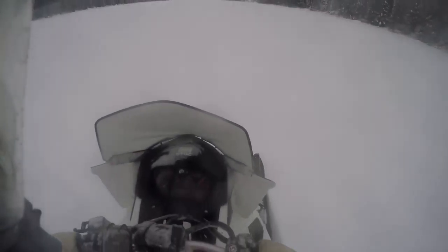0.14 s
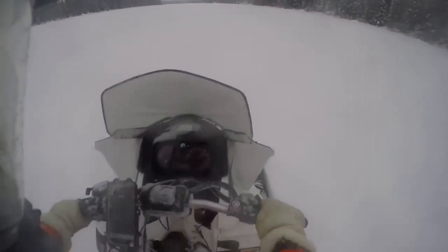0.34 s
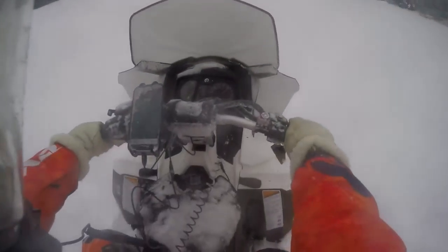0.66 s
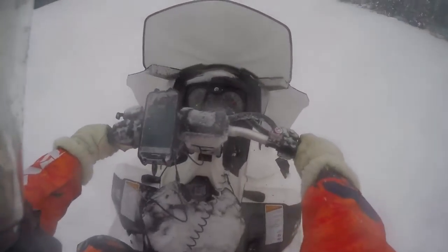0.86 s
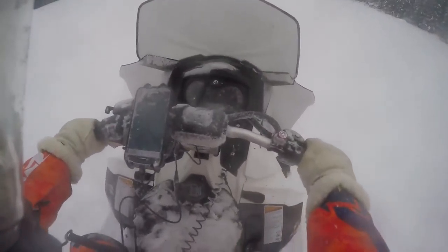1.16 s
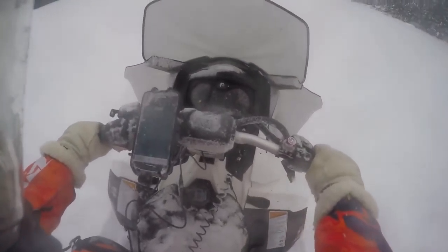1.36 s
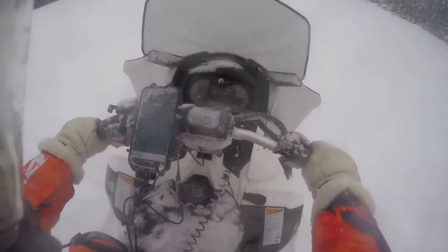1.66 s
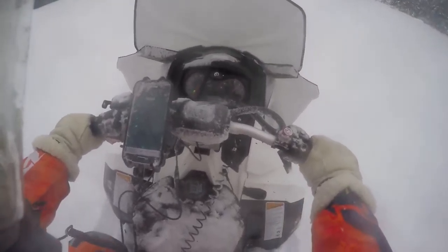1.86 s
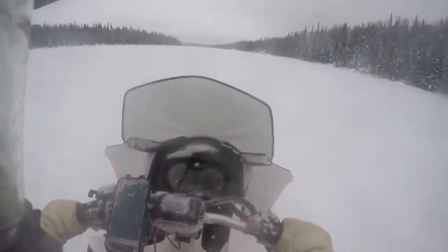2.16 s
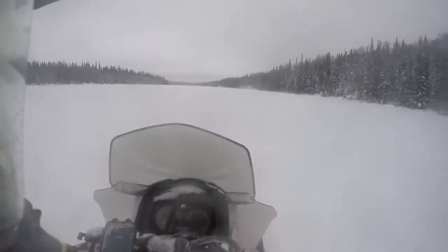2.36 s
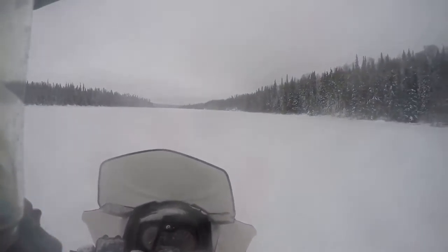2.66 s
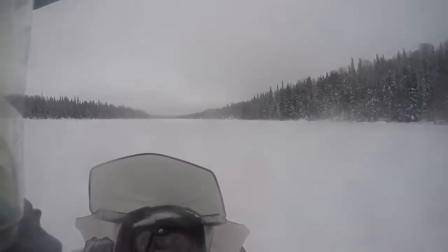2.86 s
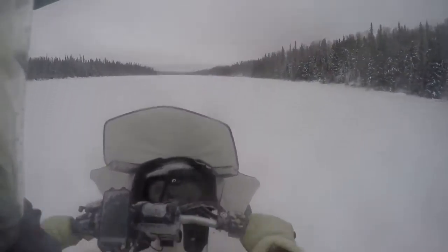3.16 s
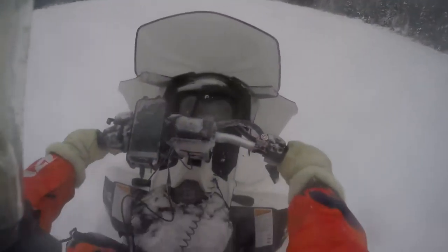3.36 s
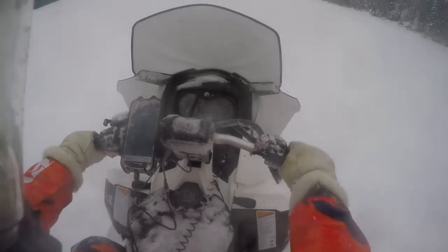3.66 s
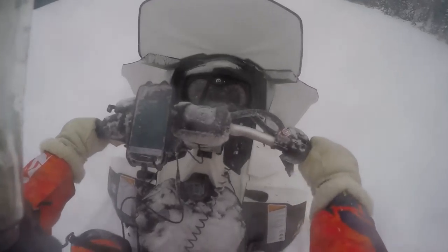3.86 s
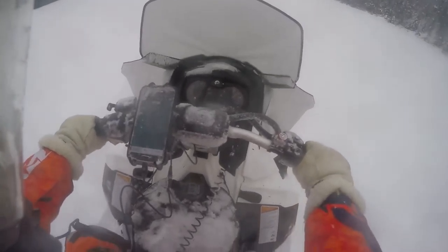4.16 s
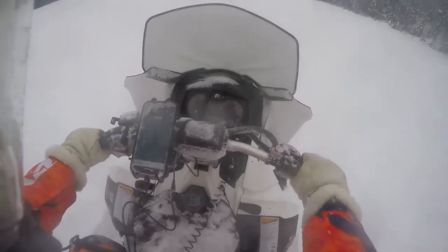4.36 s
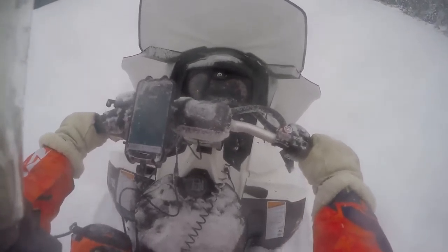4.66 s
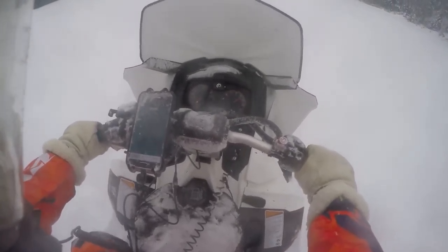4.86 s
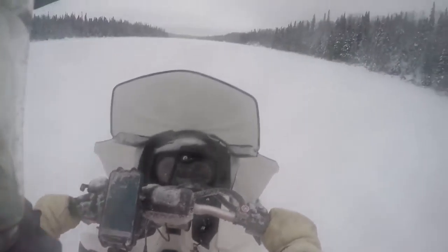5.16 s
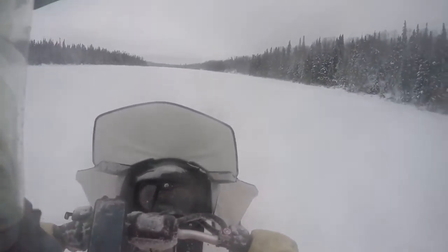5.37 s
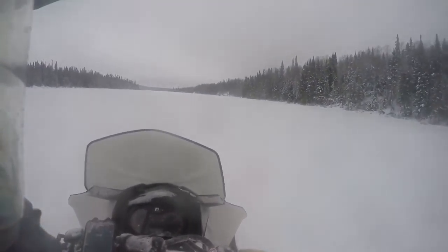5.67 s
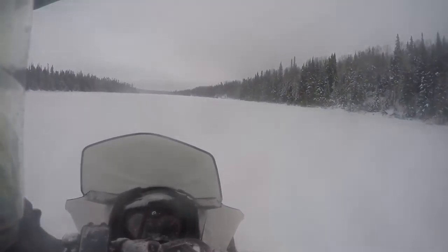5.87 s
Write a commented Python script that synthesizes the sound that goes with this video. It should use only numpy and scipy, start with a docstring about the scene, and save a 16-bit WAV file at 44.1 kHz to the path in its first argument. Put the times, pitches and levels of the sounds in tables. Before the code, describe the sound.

A snowmobile is already cruising at 0 s and never stops, heard from a cased camera on the rider's helmet over an open frozen lake. A steady engine drone and low roar blend with a humming track, rapid mechanical clatter and a narrow, boxy hiss of snow and air. A small sharp knock with an ice tick lands at 0.2 s. Wind is light at first, then deep, fluttering booms come irregularly, with strong thumps near 2.1, 2.7, 3.6 and 4.5 s. Slight rustles occur around 2.1 and 2.5 s. From about 2.4 s the revs climb a little, pulling hardest around 3.4 to 4 s. Ice ticks gather near 3.2 s, and one very loud, brief click snaps at 3.28 s. The revs sink until 4.8 s, then recover slightly. Faint ticks and wind buffets continue over the unbroken drone until 6 s.

```python
"""A three-cylinder four-stroke snowmobile engine drones, roars and clatters on a frozen lake.
The one microphone rides in a cased camera on the rider's helmet: drone and lug hum are tones locked to
the engine cycle and the track; clatter is a slowly changing noise pattern; snow and air hiss is noise
shaped by the case. Wind booms in buffets at the helmet, ice grains tick on the case, and short
noise bursts knock and rustle at the camera."""
import sys
import numpy as np
from scipy import signal
from scipy.fft import rfft, irfft
from scipy.io import wavfile
from scipy.ndimage import uniform_filter1d, map_coordinates

SR = 44100
rng = np.random.default_rng(int(sys.argv[2]) if len(sys.argv) > 2 else 0)


def bounce(signal):
    """Save signal as a 16-bit WAV file at the path given by the first command-line argument."""
    frames = np.transpose(np.atleast_2d(signal))
    limited = np.clip(frames, -1, 1)
    pcm = np.round(limited * 32767).astype(np.int16)
    wavfile.write(sys.argv[1], SR, pcm)


N = 265482
TIME = np.arange(N) / SR  # s
BIN_HZ = np.arange(N // 2 + 1) * SR / N  # frequencies of the spectrum


def undb(db):
    """Gain of a level in dB."""
    return 10 ** (np.asarray(db) / 20)


def unit(x):
    """Scaled to rms 1."""
    return x / np.sqrt(np.mean(x ** 2))


def curves(table):
    """The columns after start_s, interpolated at every sample."""
    start_s, *columns = np.transpose(table)
    return [np.interp(TIME, start_s, column) for column in columns]


def walk(rate_hz):
    """Random levels held for 1 / rate_hz seconds, smoothed twice and scaled to rms 1."""
    hold = int(SR / rate_hz)
    steps = np.repeat(rng.standard_normal(N // hold + 1), hold)
    smooth = uniform_filter1d(uniform_filter1d(steps, hold), hold)
    return unit(smooth[:N])


def colour(x, points, rings=()):
    """Shapes the spectrum along (Hz, dB) points, plus narrow peaks and notches."""
    hz = BIN_HZ + 1e-3  # keeps the logarithm finite
    point_hz, point_db = np.array(points).T
    db = np.interp(np.log(hz), np.log(point_hz), point_db)
    for centre_hz, width_hz, ring_db in rings:
        db = db + ring_db / (1 + (2 * (hz - centre_hz) / width_hz) ** 2)
    return irfft(rfft(x) * undb(db), N)


def band(x, lo_hz, hi_hz, order=2):
    """Band-pass."""
    edges = [lo_hz, min(hi_hz, .45 * SR)]
    return signal.sosfilt(signal.butter(order, edges, "band", fs=SR, output="sos"), x)


def hum(turns, db, waver_db, wander):
    """A tone locked to a phase in turns; its level wavers and its phase wanders (turns rms)."""
    level = np.sqrt(2) * undb(db + waver_db * walk(9))
    phase = turns + rng.random() + wander * walk(6)
    return level * np.sin(2 * np.pi * phase)


# broad wind rumble, relative spectrum: pitch_hz [Hz], level_db [dB]
RUMBLE_SHAPE = [(12, -20), (22, 19), (35, 10.5), (60, 14), (90, -4.5), (130, -2), (200, -16.5), (400, -49)]
# level of the rumble between about 70 and 131 Hz: start_s [s], level_db [dB]
RUMBLE_LEVEL = [(0, -50), (.4, -50.5), (1.0, -43.5), (1.8, -47), (2.2, -43.5), (2.7, -39), (3.4, -38),
                (4.0, -42), (4.6, -44.5), (5.0, -45.5), (6.02, -40)]


def wind_rumble():
    """Turbulent air at the helmet: low noise with a slowly changing level."""
    rumble = colour(rng.standard_normal(N), RUMBLE_SHAPE)
    rumble = rumble / np.std(band(rumble, 70.3, 131.0, order=4))
    return undb(curves(RUMBLE_LEVEL)[0] + 1.74 * walk(8)) * rumble


# buffets of wind at the helmet: crest_s [s], level_db [dB at the crest], length_s [s between 1/e points]
BUFFETS = [(0.166, -35, .07), (0.452, -33.5, 0.058), (0.577, -26, 0.036), (0.724, -23, 0.096),
           (0.838, -21, 0.078), (0.99, -20, 0.18), (1.138, -26, 0.043), (1.331, -19.5, 0.21),
           (1.522, -23.5, .08), (1.696, -28.5, 0.1), (1.848, -23.5, .08), (1.918, -21.5, .08),
           (2.088, -13.5, 0.1), (2.21, -19, 0.091), (2.298, -17, 0.075), (2.4, -22, 0.09),
           (2.521, -22.5, 0.13), (2.722, -15.5, 0.072), (2.813, -19, .08), (2.976, -21.5, 0.075),
           (3.05, -20.5, 0.065), (3.171, -22.5, 0.052), (3.262, -19.5, 0.059), (3.365, -16.5, 0.097),
           (3.48, -25, 0.13), (3.602, -14, 0.043), (3.674, -20, 0.035), (3.722, -16, 0.04),
           (3.843, -18, .12), (4.061, -20, 0.074), (4.258, -25.5, 0.19), (4.435, -16.5, 0.15),
           (4.615, -14.5, 0.11), (4.789, -19.5, 0.17), (4.974, -33, 0.17), (5.104, -22, 0.15),
           (5.221, -26, 0.11), (5.359, -20, 0.13), (5.46, -20, 0.053), (5.548, -19.5, 0.076),
           (5.781, -24, 0.17), (5.912, -18.5, .07), (6.02, -23.5, 0.06)]
# pitch of the boom: start_s [s], pitch_hz [Hz]
BOOM_PITCH = [(0, 54.4), (.35, 49.05), (.9, 47.34), (1.1, 52.15), (1.45, 52.3), (1.8, 50), (1.95, 45.2),
              (2.15, 45.1), (2.3, 49.2), (2.8, 49.92), (3.08, 48.56), (3.18, 44.11), (3.65, 43.05),
              (3.8, 49.5), (4.4, 47.46), (4.93, 43), (5.1, 48.23), (6.02, 52.5)]
LULL_DB = -45  # boom between buffets


def wind_boom():
    """Eddies shed by the helmet boom at one wavering pitch, swelling in each buffet."""
    swell = undb(LULL_DB)
    for crest_s, level_db, length_s in BUFFETS:
        swell = swell + undb(level_db) * np.exp(-(2 * (TIME - crest_s) / length_s) ** 2)
    turns = np.cumsum(curves(BOOM_PITCH)[0]) / SR
    return swell * hum(turns, 0, 0.67, 0.082)


# short knocks, thuds and rustles at the camera, low to high in pitch: centre_s [s], level_db [dB],
# pitch_hz [Hz, middle of the band], length_s [s from the crest down to 1/e]
KNOCK_TABLE = [(.2005, -23.5, 2200, .0012), (2.07, -42, 3000, .008), (2.075, -42, 1100, .02),
               (2.48, -43, 3200, .008), (3.175, -47, 5500, .012), (3.279, -28, 2800, .0012),
               (3.55, -47, 5000, .015), (3.73, -47, 5500, .018), (3.8, -48, 1150, .02),
               (5.14, -46, 3500, .012)]


def knocks_and_rustles():
    """Short bursts of band-limited noise at the camera: the briefest knock, the longer ones rustle."""
    out = np.zeros(N)
    for centre_s, level_db, pitch_hz, length_s in KNOCK_TABLE:
        noise = unit(band(rng.standard_normal(N), pitch_hz / 1.3, pitch_hz * 1.33))
        out += undb(level_db) * np.exp(-((TIME - centre_s) / length_s) ** 2) * noise
    return out


# ice grains striking the case: start_s [s], level_db [dB peak], low_hz [Hz], high_hz [Hz]
GRAIN_TABLE = [(0.2, -17.5, 7950, 12200), (2.48, -39, 6000, 10000), (3.18, -33, 4018, 8950),
               (3.211, -22, 3000, 15000), (3.2771, -2, 5186, 12600), (3.340, -36, 4000, 10000),
               (3.537, -39, 8084, 13030), (3.584, -40, 11000, 14470), (3.614, -34, 7000, 12000),
               (3.724, -37, 6016, 11000), (3.741, -37, 8030, 14070), (4.1405, -39, 10490, 14700),
               (4.254, -41, 11000, 15000), (4.2935, -39, 9020, 13000), (4.5945, -37, 6954, 10970),
               (4.7244, -37, 8057, 15000), (5.665, -35.5, 9060, 15040)]


def ice_grains():
    """Each grain is a click with a short fuzzy tail and one quick echo inside the case."""
    size = 512
    out, after_s = np.zeros(N + size), np.arange(size) / SR
    for start_s, level_db, low_hz, high_hz in GRAIN_TABLE:
        tick = 0.085 * rng.standard_normal(size) * np.exp(-after_s / 0.00082)
        tick[0] += 1
        tick[int(.00047 * SR)] += .3  # echo after 0.47 ms
        tick = band(tick, low_hz, high_hz, order=3)
        out[int(start_s * SR):][:size] += undb(level_db) * tick / np.abs(tick).max()
    return out[:N]


FAINT_PER_S, FAINT_DB = 3, -33  # faint high grains: mean rate, middle level before their band-pass


def fine_snow(treble_db):
    """Random clicks on the case: dense ones that follow the treble level, and sparse faint high ones."""
    snow = (rng.random(N) < 90 / SR) * undb(3.9 * rng.exponential(size=N).clip(0, 3))  # 90 per s
    faint = (rng.random(N) < FAINT_PER_S / SR) * undb(FAINT_DB + 2.5 * rng.standard_normal(N))
    return undb(treble_db - 7) * band(snow, 5000, 12000) + band(faint, 10500, 14500, order=3)


def track(lugs, hum_db, octave_db):
    """The lugs slap past the drive wheels: tones at one, two and three times the lug rate."""
    first, second = hum(lugs, hum_db, 1.5, 0.019), hum(2 * lugs, octave_db, 1.6, 0.031)
    return first + second + hum(3 * lugs, -62, 3.4, 0.032)


def clatter(cycles, memory=0.894, size=512):
    """Valves and chain repeat nearly the same rattle every cycle; each keeps part of the one before."""
    fresh = rng.standard_normal((int(cycles[-1]) + 40, size))
    pattern = signal.lfilter([1], [1, -memory], fresh, axis=0)[38:]  # skips the settling cycles
    return unit(map_coordinates(pattern.ravel(), [cycles * size], order=3))


# rider's head, down at the bars or up at the lake: start_s [s], raised [0-1]
HEAD_TABLE = [(0, 0.53), (.5, 0), (1.0, 0.2), (1.9, 0), (2.3, 0.97), (3.2, 0.86), (3.45, 0), (4.75, 0.04),
              (5.1, 0.5), (5.8, 0.9), (6.02, 0.83)]
# dB with the head down at cruise, dB added with the head up, dB added when the engine pulls
MIDDLE, SHOULDER, UPPER, TREBLE = (-50.5, 0, 2.64), (-48.5, 8, 0), (-38, -3.5, 1.95), (-45, -2.45, 1.43)


def range_levels(pull):
    """Raising the head and loading the engine change the levels of ranges of the machine noise."""
    raised = curves(HEAD_TABLE)[0]
    return [base + up * raised + load * pull for base, up, load in (MIDDLE, SHOULDER, UPPER, TREBLE)]


# machine noise through the case, relative spectrum: pitch_hz [Hz], level_db [dB]
CASE_SHAPE = [(200, -42), (340, -17.5), (425, -16.5), (697, -19), (886, -21), (975, -20.5), (1600, -5.5),
              (1870, 2), (2000, -3.5), (2980, -9), (3660, -19.5), (4580, -20), (6100, -22.5), (7160, -31),
              (15400, -50)]
# narrow rings and notches of the case: pitch_hz [Hz], width_hz [Hz], level_db [dB added at the centre]
CASE_RINGS = [(884, 27, 8.5), (1610, 100, -3.5), (1704, 99, 1.5), (1840, 51, 1.5), (2345, 240, 1),
              (2690, 140, -5), (3030, 730, -1), (3720, 240, -6), (4524, 76, 4.5), (5530, 89, -11.5),
              (5540, 180, -1.5), (7160, 300, -4.5), (7520, 340, 4.5), (11800, 340, -14), (13100, 900, 1)]
# main ring of the case, before a 5 dB cut: start_s [s], level_db [dB]
MAIN_RING = [(0, -39.5), (.3, -38), (.95, -42), (1.35, -35), (1.9, -43.5), (2.3, -35), (2.85, -35),
             (3.3, -37.5), (4.2, -36), (4.9, -51), (5.6, -34.5), (6.02, -43)]
RANGE_EDGES_HZ = 1350, 1780, 2150, 3600, 7000  # between middle, shoulder, ring, upper, treble and top


def machine(cycles, middle_db, shoulder_db, upper_db, treble_db):
    """Clatter and snow-and-air hiss through the case; each range flickers, treble and top partly together."""
    rattle = unit(band(clatter(cycles), 1530, 4600))
    hiss = rng.standard_normal(N)
    sound = colour(undb(-9.5) * rattle + hiss, CASE_SHAPE, CASE_RINGS)
    # the three firings and the whole cycle beat weakly on the sound
    firing_beat = .04 * np.cos(2 * np.pi * 3 * cycles)
    cycle_beat = .06 * np.cos(2 * np.pi * cycles)
    sound = sound * (1 + firing_beat + cycle_beat)

    # differences of smooth low-pass curves split the sound into ranges
    lowpasses = [1 / (1 + (BIN_HZ / edge_hz) ** 12) for edge_hz in RANGE_EDGES_HZ]
    shares = np.diff([0 * BIN_HZ] + lowpasses + [BIN_HZ ** 0], axis=0)
    spectrum = rfft(sound)
    middle, shoulder, ring, upper, treble, top = (unit(irfft(spectrum * share, N)) for share in shares)

    # loose snow sprays the case in gusts that lift treble and top together
    treble_db = treble_db + 0.53 * walk(16)
    top_db = -60 + 0.3 * (treble_db + 42.5)
    ring_db = curves(MAIN_RING)[0] - 5.0
    return (undb(ring_db + 0.27 * walk(14)) * ring
            + undb(middle_db + 0.21 * walk(10)) * middle
            + undb(shoulder_db + 1.6 * walk(12)) * shoulder
            + undb(upper_db + 0.51 * walk(5.26)) * upper
            + undb(treble_db + 0.6 * walk(12)) * treble
            + undb(top_db + 1.7 * walk(19)) * top)


# steady low roar of the engine, relative spectrum: pitch_hz [Hz], level_db [dB]
ROAR_SHAPE = [(60, -33), (120, 3), (180, -8), (280, -4), (360, -14), (500, -42)]


def engine_roar():
    """Steady low roar of the engine, a nearly constant noise."""
    roar = unit(colour(rng.standard_normal(N), ROAR_SHAPE))
    return undb(-46.5 + 0.14 * walk(5.5)) * roar


# exhaust and intake tones, one entry a tone: order [multiple of the engine cycle rate]
ORDERS = [2, 3, 5, 6, 8, 11, 12, 13, 15, 16, 17, 19, 20, 21, 22, 23, 25, 26, 27, 28, 30, 32, 33, 34, 35, 36,
          37, 40, 41, 42, 43, 44, 45, 46, 47, 48]
# their levels in the same sequence: cruising_db [dB], pulling_db [dB]
ORDER_LEVELS = [(-80, -80), (-52, -52), (-68, -57), (-51, -51), (-61, -80), (-68, -65), (-72, -68),
                (-64, -60), (-70, -58), (-69, -65), (-71, -77), (-74, -69), (-72, -62), (-66, -62),
                (-64, -59), (-64, -80), (-73, -66), (-69, -71), (-66, -63), (-66, -65), (-64, -61),
                (-65, -68), (-61, -56), (-65, -62), (-60, -63), (-52, -62), (-59, -64), (-66, -54),
                (-58, -49), (-55, -52), (-50, -70), (-50, -59), (-53, -43), (-62, -47), (-45, -60),
                (-48, -56)]


def drone(cycles, pull):
    """Exhaust and intake tones on multiples of the engine cycle; their balance shifts as the engine pulls."""
    out = np.zeros(N)
    for order, (cruising_db, pulling_db) in zip(ORDERS, ORDER_LEVELS):
        out += hum(order * cycles, cruising_db + pull * (pulling_db - cruising_db), 1.87, 0.046)
    return out


# engine and track: start_s [s], cycle_hz [Hz, engine cycles], lug_hz [Hz, lugs passing],
# hum_db [dB, lug hum], octave_db [dB, its octave]
DRIVE_TABLE = [(0.0, 39.65, 142.3, -39, -49), (0.7, 39.4, 139.2, -39, -49), (1.2, 39.8, 139.0, -37.5, -46),
               (1.6, 39.1, 137.5, -38.5, -48), (2.05, 38.8, 136.8, -42.5, -50),
               (2.4, 40.2, 138.3, -42, -53), (2.8, 41.45, 140.5, -39.5, -54), (3.4, 41.85, 143.3, -40, -53),
               (3.9, 41.9, 145.6, -39, -52), (4.2, 41.25, 145.7, -40, -51), (4.4, 40.5, 145.6, -40, -51),
               (4.8, 38.65, 143.1, -41, -50), (5.2, 39.15, 141.8, -38.5, -50),
               (6.02, 40.0, 140.2, -38, -51)]


def scene():
    """All sources summed at the single microphone on the helmet."""
    cycle_hz, lug_hz, hum_db, octave_db = curves(DRIVE_TABLE)
    cycles, lugs = np.cumsum(cycle_hz) / SR, np.cumsum(lug_hz) / SR
    # the engine pulls harder when it revs above its cruising rate
    pull = np.clip((cycle_hz - 40) / 1.67, 0, 1)
    middle_db, shoulder_db, upper_db, treble_db = range_levels(pull)
    air = wind_rumble() + wind_boom()
    at_camera = knocks_and_rustles() + ice_grains() + fine_snow(treble_db)
    lug_hum = track(lugs, hum_db, octave_db)
    noise = machine(cycles, middle_db, shoulder_db, upper_db, treble_db)
    engine = engine_roar() + drone(cycles, pull)
    return (air + at_camera + lug_hum + noise + engine)[None]


TOP_HZ = 15350  # upper limit of the camera's sound


def record(dry):
    """The camera cuts the top with a steep low-pass."""
    return signal.sosfilt(signal.ellip(10, .2, 60, TOP_HZ, fs=SR, output="sos"), dry)


dry = scene()
out = record(dry)
bounce(out)
```